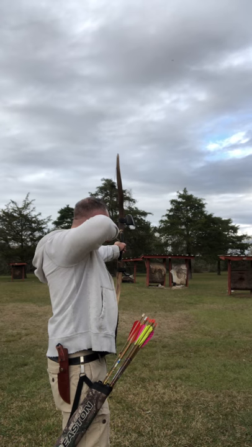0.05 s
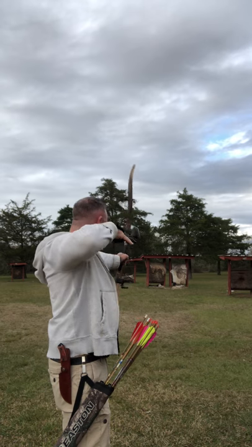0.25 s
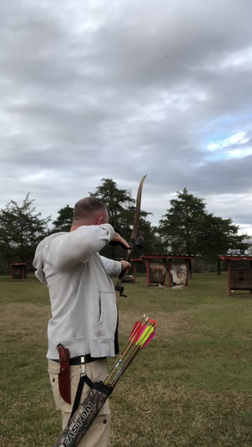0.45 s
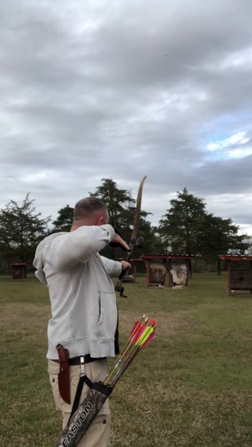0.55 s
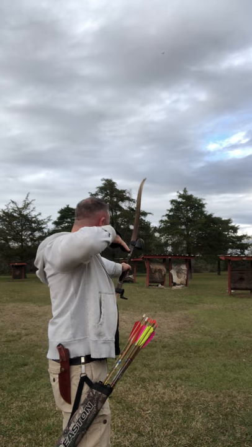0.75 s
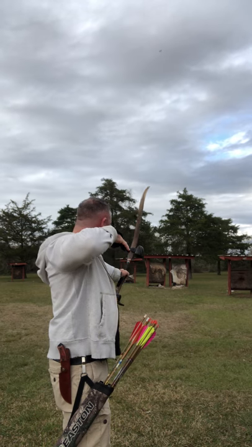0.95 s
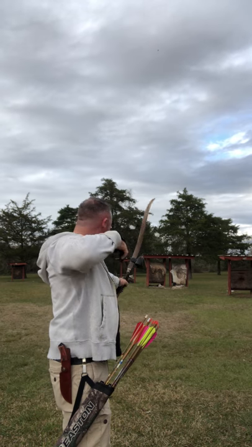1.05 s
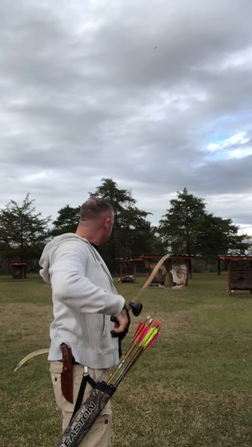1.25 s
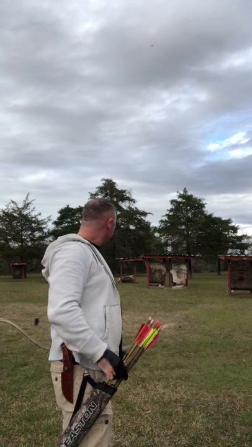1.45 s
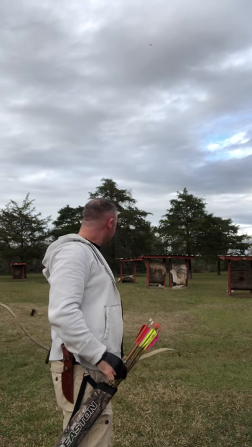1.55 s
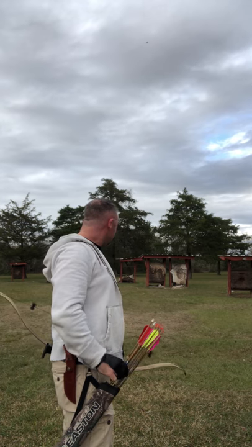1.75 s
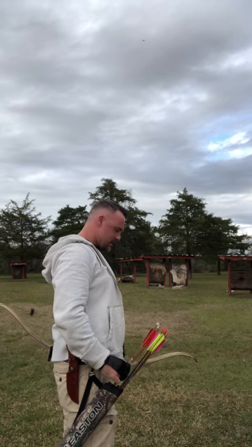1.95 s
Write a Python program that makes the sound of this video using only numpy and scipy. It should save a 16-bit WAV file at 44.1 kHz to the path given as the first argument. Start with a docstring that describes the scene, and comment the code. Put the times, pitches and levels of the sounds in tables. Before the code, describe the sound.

Bow shot outdoors: hard string slap with brief hum, faint far hit, then clothing rustle

```python
"""A recurve bow is shot on an open grass range: a falling chirp is the string slap, decaying modes are
the ringing limbs and tips, coloured grains the rattle, and a series of partials the string's hum.
The arrow hits a far target with a noise burst, shaft modes and two thuds; trees and sheds echo.
The archer then shifts: grains and noise rustle as grass and clothing, with snaps and knocks as short sines.
Filtered noise makes distant rumble, hiss and insects; gliding sines make a few faint bird notes."""
import sys
import numpy as np
from scipy import signal
from scipy.fft import rfft, irfft
from scipy.io import wavfile
from scipy.ndimage import uniform_filter1d

SR = 44100
rng = np.random.default_rng(int(sys.argv[2]) if len(sys.argv) > 2 else 0)


def wrap_up_sound(samples):
    """Save the sound to the file named by the first command line argument, as 16-bit audio."""
    columns = np.atleast_2d(samples).T
    # keep every value between -1 and 1, then stretch to whole-number steps
    tamed = np.clip(columns, -1, 1)
    steps = np.round(tamed * 32767).astype(np.int16)
    wavfile.write(sys.argv[1], SR, steps)


N = 88200
T = np.arange(N) / SR  # time, s
SLAP_S, HIT_S = .2048, .5955  # start of the string slap and of the arrow's impact

# Spectrum shared by the string's swish and the bow's rattle: pitch_hz, relative gain_db
BOW_NOISE_COLOUR = [(410, -22), (700, 1.5), (1300, -8.5), (2030, -5), (2660, -12), (5710, -15.5),
                    (6680, -23), (8000, -19.5), (15500, -36)]


def from_db(db):
    """Logarithmic level: 20 dB is a factor of ten in amplitude."""
    return 10 ** (np.asarray(db) / 20)


def rms_one(x):
    """Normalization by the root mean square, which becomes 1."""
    return x / np.sqrt(np.mean(x ** 2) + 1e-20)


def white_noise():
    """White noise: independent samples hold equal power at all frequencies."""
    return rng.standard_normal(N)


def coloured(x, points):
    """Linear filtering: the spectrum is multiplied by a gain curve over log frequency; rms 1."""
    hz, db = np.transpose(points)
    grid = np.maximum(np.arange(N // 2 + 1) * SR / N, 1)
    gain = from_db(np.interp(np.log(grid), np.log(hz), db))
    return rms_one(irfft(rfft(x) * gain, N))


def band_noise(low_hz, high_hz, x):
    """Band-pass filtering: only the part of x near one band survives."""
    return signal.sosfilt(signal.butter(2, [low_hz, high_hz], "band", fs=SR, output="sos"), x)


def shape(start, rise, hold, t60):
    """Damped envelope: linear rise, hold, then exponential decay by 60 dB in t60 (all in s)."""
    t = T - start
    decay_db = -60 * np.maximum(t - rise - hold, 0) / t60
    return np.clip(t / rise, 0, 1) * from_db(decay_db)


def drift(rate_hz):
    """Low-passed noise: two equal poles leave slow random motion; rms 1."""
    r = np.exp(-2 * np.pi * rate_hz / SR)
    noise = rng.standard_normal(2 * N)
    return rms_one(signal.lfilter([1], [1, -2 * r, r * r], noise)[N:])  # settled half


def ring(clicks, hz, t60):
    """Damped resonator: a unit click starts a decaying sine of height about 1."""
    r = from_db(-60 / (t60 * SR))
    w = 2 * np.pi * min(hz, SR / 2.2) / SR
    return signal.lfilter([0, np.sin(w)], [1, -2 * r * np.cos(w), r * r], clicks + 1e-18)


def strike(blows, modes, spread_db):
    """Modal excitation: every blow drives every mode with a random strength and sign."""
    s, db = np.transpose(blows)
    out = 0
    chance = rng.standard_normal((len(s), 2, len(modes)))
    for k, (hz, mode_db, t60) in enumerate(modes):
        strength = from_db(db + mode_db - 11 + spread_db * chance[:, 0, k])
        clicks = np.zeros(N)
        clicks[(s * SR).astype(int)] = strength * np.sign(chance[:, 1, k])
        out = out + ring(clicks, hz, t60)
    return out


def grains(per_s):
    """Granular friction: random clicks of uneven size each ring briefly at one of 20 pitches; rms 1."""
    spread_db, t60_cycles = 3.2, 11.0
    size = from_db(spread_db * np.minimum(rng.exponential(1, N), 4)) * rng.choice([-1, 1], N)
    born = size * (rng.random(N) < per_s / SR)
    dealt = rng.integers(0, 20, N)
    out = 0
    for k, hz in enumerate(np.geomspace(600, 16000, 20)):
        out = out + hz * ring(born * (dealt == k), hz, t60_cycles / hz)
    return rms_one(out)


def string_slap():
    """Dispersion: in the limbs' bending wave the highs arrive first, so the pitch falls."""
    from_hz, to_hz, fall_s = 2600, 784, 0.00191
    since = np.maximum(T - SLAP_S, 0)
    hz = to_hz + (from_hz - to_hz) * np.exp(-since / fall_s)
    phase = 2 * np.pi * np.cumsum(hz * (since > 0)) / SR
    envelope = shape(SLAP_S, 0.004, 0.00017, 0.017) ** 2  # squaring doubles the decay rate
    return from_db(-15.5) * envelope * np.sin(phase)


def grip_boom():
    """Damped oscillation: the grip booms as one short low tone."""
    start_s, pitch_hz = .2089, 575.6
    envelope = from_db(-17) * shape(start_s - .001, 0.0011, 0.0033, 0.023)
    return envelope * np.cos(2 * np.pi * pitch_hz * (T - start_s))


def limb_knocks():
    """Modal ringing: knocks excite the damped bending modes of the limbs."""
    # Knocks on the limbs: start_s, level_db
    knock_blows = [(.2108, -21), (.2135, -22.5), (.2245, -26), (.2365, -31), (.2455, -38)]
    # Limb modes: pitch_hz, relative level_db, t60_s
    limb_modes = [(790, 4, 0.016), (966, 6.5, .028), (1180, -12, 0.038), (1460, 6.5, 0.023),
                  (1600, 0, 0.023), (2050, -1.5, .033), (2184, 3.5, 0.021), (2500, 1, 0.025)]
    low_pass = signal.butter(2, 4300, fs=SR, output="sos")
    return signal.sosfilt(low_pass, strike(knock_blows, limb_modes, spread_db=0.5))


def tip_ticks():
    """Impulsive excitation: sharp ticks of the string ring the limb tips."""
    # Ticks of the string on the limb tips: start_s, level_db
    tick_blows = [(.2111, -12), (.2238, -18), (.2292, -37), (.2348, -37), (.2478, -35), (.2685, -37),
                  (.285, -50), (.293, -46), (.301, -50), (.3245, -56)]
    # Tip modes: pitch_hz, relative level_db, t60_s
    tip_modes = [(2770, 5.5, 0.0032), (4690, 2, 0.0046), (5600, 3, 0.0054), (7790, 0.5, 0.0035),
                 (10500, -20.5, 0.0043), (14900, -43, .004)]
    return strike(tick_blows, tip_modes, spread_db=2.5)


def squeal():
    """Tone burst: a sine under a brief envelope gives a short squeal before the second tick."""
    envelope = from_db(-25) * shape(.22, 0.00045, 0.0014, 0.0099)
    return envelope * np.sin(2 * np.pi * 2726 * T)


def string_hum():
    """String vibration: near-harmonic partials decay at their own rates and start at their own delays."""
    # String partials: multiple of the base pitch, level_db, t60_s of the unsquared envelope, delay_s
    string_partials = [(1, -45.5, 0.51, .001), (1.5, -51, 1, .001), (2.05, -29, 0.028, 0.0007),
                       (2.92, -35.5, 0.504, 0.0015), (3.0, -30, 0.097, 0.0018), (4.0, -28.5, 0.11, 0.01),
                       (5.1, -40.5, 0.19, 0.0035), (6.9, -44.5, 0.15, 0.0055), (8.9, -45, 0.19, 0.0022)]
    start_s, base_hz = .2209, 108.3
    out = 0
    for multiple, db, t60, delay in string_partials:
        envelope = from_db(db) * shape(start_s + delay, 0.008, 0.009, t60) ** 2
        out = out - envelope * np.cos(2 * np.pi * multiple * base_hz * (T - start_s))
    return out


def string_swish():
    """Flow noise: the string cuts the air, heard as a short burst of coloured noise."""
    envelope = from_db(-46) * shape(.196, .0095, .002, .02) ** 3  # cubing triples the decay rate
    return envelope * coloured(white_noise(), BOW_NOISE_COLOUR)


def bow_rattle():
    """Granular noise: a dense crowd of tiny impacts mixed with noise dies away."""
    envelope = from_db(-34.5) * shape(.2055, 0.0054, 0.025, 0.12)
    return envelope * coloured(grains(14000) + 0.43 * white_noise(), BOW_NOISE_COLOUR)


def bow():
    """Superposition: the pressures of all the bow's parts add."""
    tones = string_slap() + grip_boom() + squeal() + string_hum()
    return tones + limb_knocks() + tip_ticks() + string_swish() + bow_rattle()


def target():
    """Impact: a tearing noise as the point enters, shaft resonance, then damped thuds of the butt."""
    # Spectrum of the tearing noise: pitch_hz, relative gain_db
    hit_colour = [(410, -36), (900, -3), (1470, -3), (2400, -8), (2870, -15.5), (4300, -9), (6020, -20),
                  (9230, -23), (15500, -30)]
    # Arrow shaft modes: pitch_hz, relative level_db, t60_s
    shaft_modes = [(1350, 2, 0.019), (2240, -1.5, 0.017), (3470, -4, 0.022), (4300, -10.5, .015),
                   (4980, -3.5, 0.016), (6570, -19, .008)]
    # Target butt modes: pitch_hz, relative level_db before smoothing, t60_s
    butt_modes = [(144, -1, 0.034), (224, 0.5, 0.047), (348, -0.5, 0.058), (806, 2, 0.028),
                  (1185, 7, 0.025)]
    thud_lag_s = .008  # the butt knocks twice
    crack = from_db(-50) * shape(HIT_S, 0.0011, 0.0025, 0.022)
    echo = from_db(-66) * shape(HIT_S, 0.0044, 0.0052, 0.42)
    tearing = (crack + echo) * coloured(white_noise(), hit_colour)
    shaft = strike([(HIT_S + 0.00104, -36)], shaft_modes, spread_db=2.0)
    thuds = [(HIT_S + thud_lag_s, -36), (HIT_S + 2 * thud_lag_s, -36)]
    butt = strike(thuds, butt_modes, spread_db=5)
    return tearing + shaft + uniform_filter1d(butt, size=24)  # a running mean dulls the thuds


def echoes():
    """Scattering: trees and sheds return the shot as decaying noise; a dull part of shot and hit lingers."""
    # Spectrum scattered back by trees and sheds: pitch_hz, relative gain_db
    echo_colour = [(290, -38), (500, -4.5), (748, 2), (815, -9), (1040, 3), (1310, -8), (1390, 1.5),
                   (4500, -7.5), (7000, -13.5), (15500, -24)]
    # Decay of the echo, faster in the treble: low_hz, high_hz, t60_s
    echo_bands = [(296, 1840, 1), (1550, 5160, 0.71), (4000, 7600, 0.57), (8000, 22000, 0.5)]
    wash = coloured(white_noise(), echo_colour)
    near = 0
    for low_hz, high_hz, t60 in echo_bands:
        near = near + shape(SLAP_S, .02, 0.023, t60) * band_noise(low_hz, high_hz, wash)
    near_gain = from_db(-48 + drift(25))  # wavers by 1 dB rms
    dull_hz = 814
    dull = rms_one(band_noise(dull_hz / 2, dull_hz * 1.26, white_noise()))
    shot_late = from_db(-65.5) * shape(SLAP_S, 0.39, 0.39, 2.6)
    hit_late = from_db(-85) * shape(HIT_S, 0.018, 0.071, 0.17)
    return near_gain * near + (shot_late + hit_late) * dull


def rustle():
    """Friction noise: grass and clothing give dense grains and swish at the level of the movement."""
    # Level of the movement: time_s, level_db
    movement = [(1.47, -82), (1.482, -85), (1.494, -57), (1.501, -46), (1.517, -61.5), (1.54, -54),
                (1.55, -66.5), (1.572, -55.5), (1.586, -46), (1.606, -59.5), (1.63, -63), (1.646, -67.5),
                (1.686, -75.5), (1.704, -60.5), (1.712, -74), (1.732, -60), (1.75, -75), (1.758, -70),
                (1.768, -80), (1.778, -59.5), (1.796, -75), (1.805, -62.5), (1.823, -68), (1.831, -50.5),
                (1.838, -66), (1.901, -74), (1.918, -48), (1.933, -57.5), (1.942, -45.5), (1.96, -52.5),
                (1.965, -51.5), (1.974, -57.5), (1.983, -49.5), (2.0, -67)]
    # Spectrum of grass and clothing: pitch_hz, relative gain_db
    rustle_colour = [(350, -35), (600, -6), (820, -3.5), (993, 0.5), (1730, -5.5), (2400, -4), (2640, -8.5),
                     (5590, -10), (8520, -22.5), (15500, -26.5)]
    s, db = np.transpose(movement)
    level = from_db(np.interp(T, s, db, left=-120))
    swish_share = 0.5  # part of the power before colouring
    mix = np.sqrt(1 - swish_share) * grains(4500) + np.sqrt(swish_share) * white_noise()
    return level * coloured(mix, rustle_colour)


def snaps_and_small_echo():
    """Damped oscillation: each single snap, knock or small echo is a short decaying sine."""
    # Snaps, knocks and, last, a small echo of the hit:
    # start_s, level_db, pitch_hz, cycles in which the decay falls 30 dB
    snap_events = [(1.5648, -43, 4770, 8.5), (1.5793, -31.5, 5600, 6.6), (1.5803, -38.5, 2110, 7.1),
                   (1.5113, -44, 1490, 7.9), (1.5877, -32, 2330, 15), (1.6246, -46, 1600, 12),
                   (1.6373, -55, 11000, 17), (1.594, -51, 335.5, 17), (1.69, -55, 5200, 5),
                   (1.7011, -37, 4670, 2.7), (1.701, -44.5, 12000, 7.7), (1.704, -60, 4000, 5.7),
                   (1.7182, -49, 5200, 5.4), (1.7365, -56, 4250, 9), (1.757, -56, 10500, 5),
                   (1.757, -56, 2000, 6.8), (1.7777, -45, 1870, 3.2), (1.8057, -55, 5100, 5),
                   (1.8197, -60, 5200, 4), (1.8277, -41.5, 5800, 5), (1.8305, -41.5, 3160, 4.4),
                   (1.9399, -38, 1110, 2.9), (1.9454, -39.5, 1250, 2.5), (1.9816, -38.5, 4200, 2.9),
                   (.668, -58.5, 2260, 34)]
    out = 0
    for s, db, hz, cycles in snap_events:
        envelope = from_db(db) * shape(s, 0.81 / hz, 0, 2 * cycles / hz)
        out = out + envelope * np.sin(2 * np.pi * hz * (T - s))
    return out


def birds():
    """Modulation: whistles glide and waver in pitch and flutter in level, blurred by distance."""
    # Bird notes: start_s, length_s, pitch_hz, glide_hz, level_db before the flutter
    bird_notes = [(0.696, 0.007, 6000, 12, -74), (0.699, 0.014, 5450, -40, -68),
                  (0.722, 0.02, 5300, -200, -85), (0.76, 0.01, 5450, 3, -86),
                  (0.994, 0.003, 5250, -200, -82), (0.996, 0.003, 4100, -100, -87),
                  (1.187, 0.012, 6600, 159, -79), (1.198, 0.014, 7900, -100, -81),
                  (1.22, 0.011, 7900, -100, -81), (1.24, 0.011, 7850, -54, -83)]
    waver_hz = 130 * drift(430)
    flutter = from_db(4.5 * drift(240))
    out = 0
    for s, length, hz, glide_hz, db in bird_notes:
        part = np.clip((T - s) / length, 0, 1)
        tone = np.sin(2 * np.pi * np.cumsum(hz + glide_hz * part + waver_hz) / SR)
        out = out + from_db(db) * shape(s, 0.0019, length, .06) * tone
    return out * flutter


def insects():
    """Band-limited noise: the insects merge into one steady high band."""
    centre_hz, width_hz = 6800, 720
    edges = [centre_hz - width_hz / 2, centre_hz + width_hz / 2]
    band = signal.butter(1, edges, "band", fs=SR, output="sos")
    return from_db(-85) * rms_one(signal.sosfilt(band, white_noise()))


def leaves():
    """Stationary noise: leaves and hiss keep a steady level and spectrum."""
    # Spectrum of leaves and hiss: pitch_hz, relative gain_db
    leaf_colour = [(150, -32), (250, -2), (350, -5), (536, -5), (595, -8), (799, -4), (934, -8),
                   (1110, -11), (1550, -18), (2340, -27), (6090, -29), (6750, -25), (8170, -37),
                   (15800, -41)]
    return from_db(-64) * coloured(white_noise(), leaf_colour)


def rumble():
    """Amplitude modulation: far low-frequency noise comes and goes."""
    # Spectrum of the rumble: pitch_hz, relative gain_db
    rumble_colour = [(26, -7.5), (45, 8), (64, -1.5), (108, 3), (134, -5.5), (166, -2), (260, -17),
                     (340, -23), (570, -120)]
    # Level of the rumble: time_s, level_db before the bass cut
    rumble_level = [(0.0, -57), (0.08, -49.5), (0.2, -51.5), (0.24, -53), (0.28, -42), (0.31, -45),
                    (0.36, -51), (1.0, -53.5), (1.02, -48.5), (1.25, -54), (1.98, -52), (2.0, -44)]
    s, db = np.transpose(rumble_level)
    return from_db(np.interp(T, s, db)) * coloured(white_noise(), rumble_colour)


def scene():
    """Superposition: the pressures of all sources add at one microphone."""
    events = bow() + target() + echoes() + rustle() + snaps_and_small_echo()
    background = birds() + insects() + leaves() + rumble()
    return (events + background)[None]


def record(dry):
    """Band limitation: the microphone drops the deep bass, and the top is cut."""
    thin = signal.sosfilt(signal.butter(8, 51.7, "high", fs=SR, output="sos"), dry)
    return signal.sosfilt(signal.cheby2(28, 60, 16150, fs=SR, output="sos"), thin)


dry = scene()
out = record(dry)
wrap_up_sound(out)
```